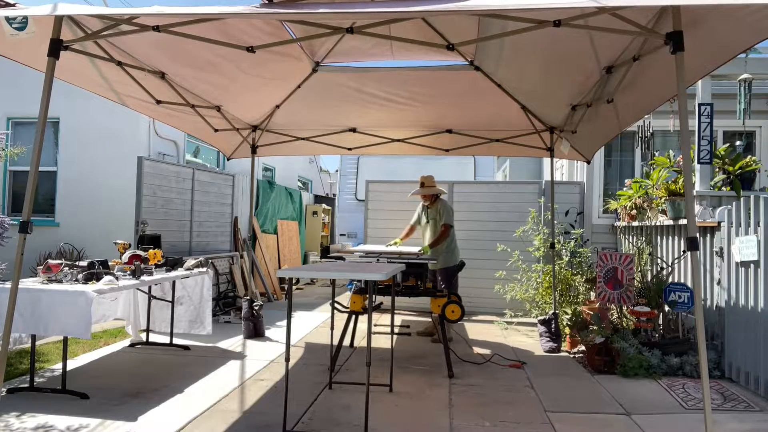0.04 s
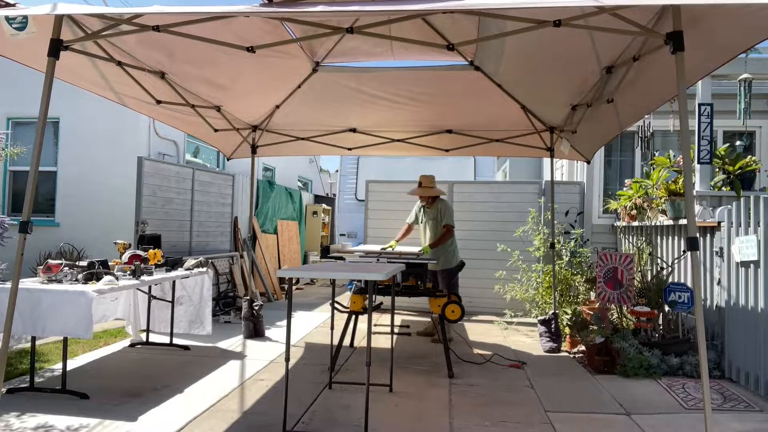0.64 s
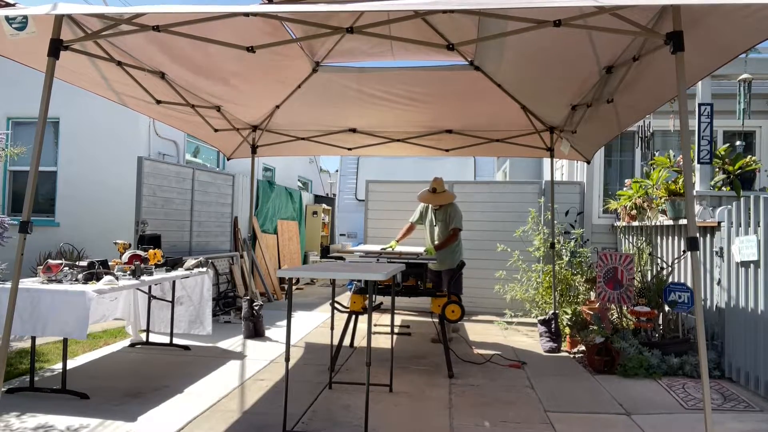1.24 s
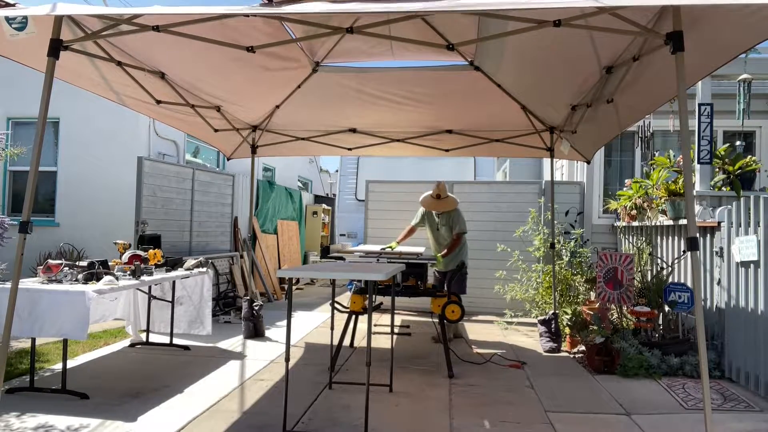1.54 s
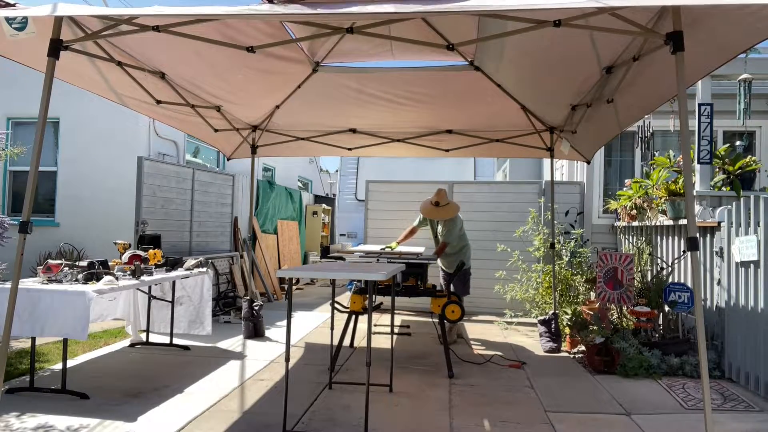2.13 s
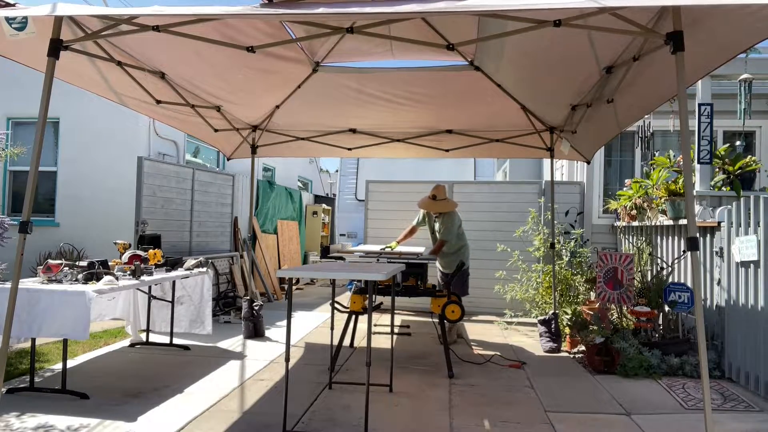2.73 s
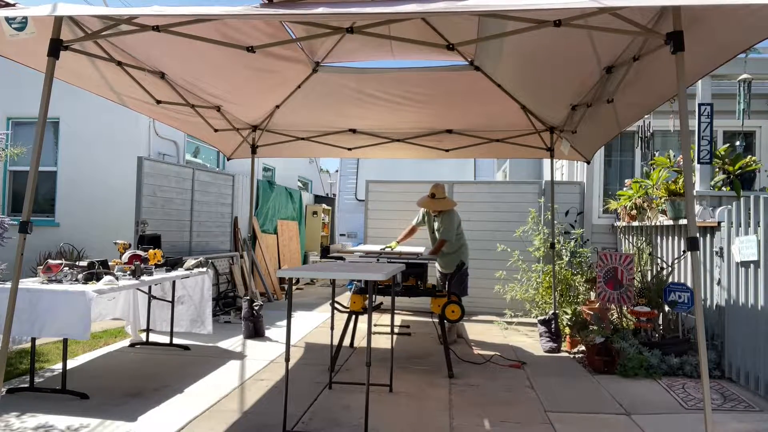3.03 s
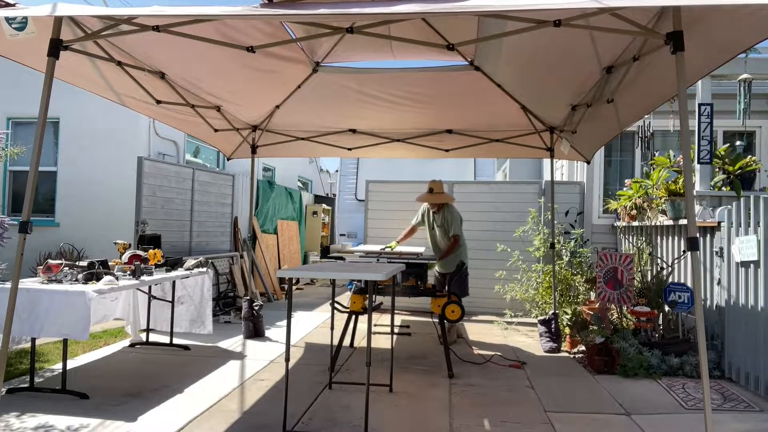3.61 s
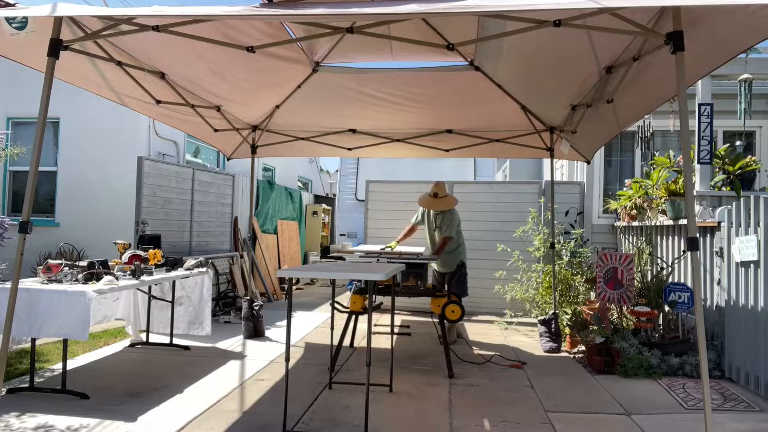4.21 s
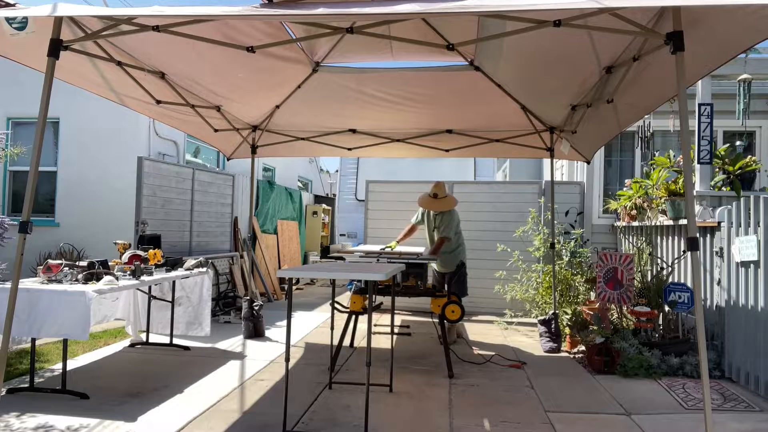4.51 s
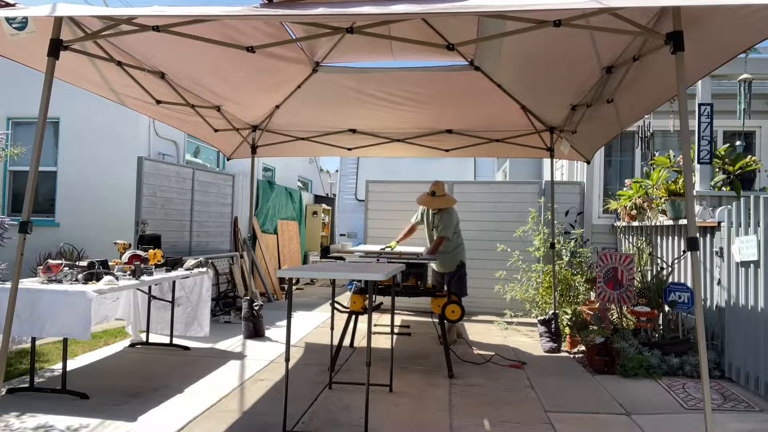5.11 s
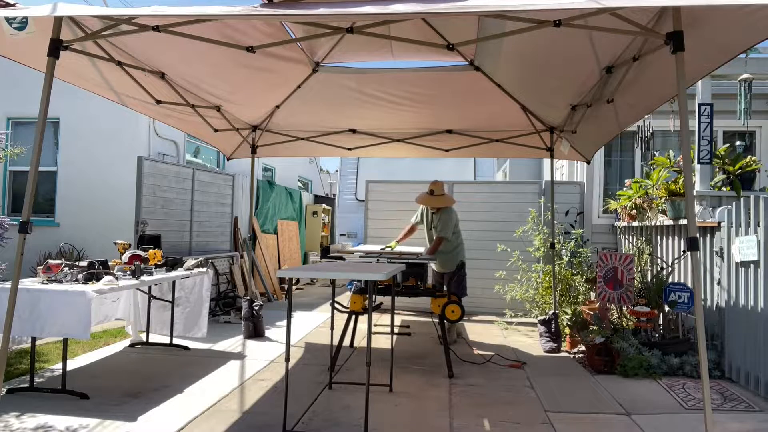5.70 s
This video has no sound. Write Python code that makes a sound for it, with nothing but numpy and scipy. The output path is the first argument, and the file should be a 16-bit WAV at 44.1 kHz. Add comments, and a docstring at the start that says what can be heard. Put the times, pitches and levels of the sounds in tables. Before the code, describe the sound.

For the first two seconds, a breeze rumbles and thumps on the microphone over a faint, low outdoor rush. Beneath it a wooden board slides softly across a saw table in short grainy strokes, with a few light ticks up to about 2.5 seconds. At 2.7 seconds a table saw starts with a loud slam and clatter, its steel stand ringing briefly. The motor hums and sizzles, the gears roar and a whine climbs. At about 3.2 seconds the power cuts and the saw coasts down, the whine falling while the blade rings and shimmers, with a few more wind bumps until around 4 seconds. A small tick comes at 5.2 seconds. At 5.4 seconds the saw jolts on again, roaring and rising in pitch, and is still running at the end, near 6 seconds.

```python
"""First a breeze thumps on the microphone while a wooden board slides and ticks on a saw table outdoors.
Then the table saw starts with a slam, runs for half a second, coasts down and is switched on again.
Each start jolts the gears and sets the steel stand ringing. The gears roar, the motor hums and sizzles,
the cooling fan whines higher as the speed climbs, and the spinning blade rings and shimmers."""
import sys
import numpy as np
from scipy import signal
from scipy.fft import rfft, irfft, next_fast_len
from scipy.io import wavfile
from scipy.ndimage import uniform_filter1d

SR = 44100
rng = np.random.default_rng(int(sys.argv[2]) if len(sys.argv) > 2 else 0)


def pcm_store(signal):
    """Save signal as 16-bit PCM."""
    levels = np.round(np.clip(np.atleast_2d(signal), -1, 1) * 32767)
    wavfile.write(sys.argv[1], SR, levels.astype(np.int16).T)


N = 262395
T = np.arange(N) / SR
HZ = np.fft.rfftfreq(N, 1 / SR)

# When the motor has power. Each row: on and off in seconds, then what the load adds, in dB:
# gear roar, brush sizzle, change in the blade's ring, fan whine.
MOTOR_RUNS = [(2.687, 3.175, -38, -31.5, 3.5, -24), (5.361, 6.1, -24, -30, -7, -17.5)]
# Motor speed is always given as the pitch of its fan, in Hz.
TOP_HZ, FAN_CYCLES_PER_BLADE_TURN = 3510, 42.7


def amp(db):
    """Turns decibels into a gain."""
    return np.exp(np.asarray(db) * (np.log(10) / 20))


def unit(x):
    """Scales a sound so that the mean of its channels has an average strength (rms) of 1."""
    return x / np.sqrt(np.mean(np.atleast_2d(x).mean(0) ** 2) + 1e-20)


def curve(points, hz=HZ):
    """Joins rows of frequency and value into a curve over all frequencies."""
    f, value = np.transpose(points)
    return np.interp(np.log(hz + 1), np.log(f + 1), value)


def lift(resonances):
    """The boost or cut in dB that a set of resonances gives each frequency."""
    return sum(db / (1 + (2 * (HZ - hz) / width) ** 2) for hz, width, db in resonances)


def ripple(size):
    """Random peaks and dips over frequency; a larger size makes them wider."""
    return unit(uniform_filter1d(rng.standard_normal(len(HZ)), size=size))


def coloured(x, spectrum_db):
    """Filters a sound with a gain in dB for each frequency."""
    size = next_fast_len(N + SR // 4, True)
    gain = amp(np.interp(np.fft.rfftfreq(size, 1 / SR), HZ, spectrum_db))
    return irfft(rfft(x, size) * gain, size)[..., :N]


def ramp(start, rise):
    """Climbs from 0 to 1 in rise seconds."""
    return np.clip((T - start) / rise, 0, 1)


def held(start, end, rise, fall):
    """A level that ramps up, holds until the end, and dies away."""
    return ramp(start, rise) * np.exp(-np.maximum(T - end, 0) / fall)


def add(mix, start, sound):
    """Mixes a sound in at a start time in seconds."""
    part = mix[:, round(start * SR):][:, :sound.shape[1]]
    part += sound[:, :part.shape[1]]


def drift(hz):
    """A random wobble, in complex numbers, that changes up to about hz times a second."""
    t = np.linspace(0, T[-1], 16384)
    f = np.fft.fftfreq(len(t), t[1])
    wobble = np.fft.ifft(np.exp(2j * np.pi * rng.random(len(t))) / (1 + (f / hz) ** 4))
    return np.interp(T, t, wobble / wobble.std())


def wavering_tone(cycles, shake, shake_hz):
    """A tone whose strength and phase waver; shake runs from 0 (pure) to 1 (all wobble)."""
    wobble = drift(shake_hz)
    angle = np.float32(2 * np.pi * (cycles - np.floor(cycles) + rng.random()))
    steady = np.sqrt(1 - shake ** 2)
    return (steady + shake * wobble.real) * np.cos(angle) - shake * wobble.imag * np.sin(angle)


def noise(spectrum_db, count=N):
    """Stereo noise of strength 1 with a given spectrum; it reaches the right side slightly earlier."""
    # How the microphone's two sides compare. Each row: frequency in Hz, then the value named.
    likeness = [(60, .42), (150, .42), (300, .8), (700, .7), (2000, .62), (4500, .5), (8000, .82),
                (15000, .8)]  # how alike they are, from 0 to 1
    balance = [(60, 0.0), (120, 0.43), (240, 0.9), (480, 0.75), (950, -1.1), (1890, -1.3), (3770, 1),
               (7520, -0.91), (15000, 0.0)]  # left minus right in dB
    left_lead = [(100, 0), (450, -.2), (1000, -.35), (3700, -1.1), (5700, -1.7), (8500, -1.8),
                 (13000, -1.1)]  # how far the left is ahead, in radians
    size = next_fast_len(count, True)
    f = np.fft.rfftfreq(size, 1 / SR)
    same, lean_db = np.clip(curve(likeness, f), 0, 1), curve(balance, f)
    common, separate = rng.standard_normal((2, len(f))) + 1j * rng.standard_normal((2, len(f)))
    left = common * np.exp(1j * curve(left_lead, f)) * amp(lean_db / 2)
    right = (same * common + np.sqrt(1 - same ** 2) * separate) * amp(-lean_db / 2)
    gain = amp(np.interp(f, HZ, spectrum_db))
    return unit(irfft(np.array([left, right]) * gain, size)[:, :count])


def neighbourhood(level_db=-59):
    """The faint, steady, low rush of the surroundings."""
    # Each row: frequency in Hz, relative level in dB.
    spectrum = [(15, -49), (25, -65.5), (76, -9.5), (206, -11.5), (277, -3.5), (326, -16.5), (394, -7.5),
                (796, -19), (1700, -29), (3340, -43.5), (8140, -46), (10700, -57.5), (13600, -54.5),
                (16000, -75)]
    return amp(level_db) * noise(curve(spectrum))


def wind(calm_db=-58, lump_db=4.5):
    """Gusts buffet the microphone with a lumpy rumble; single swirls of air push and then pull on it."""
    # The rumble. Each row: frequency in Hz, relative level in dB.
    spectrum = [(20, -18), (45, 2.5), (80, 5.5), (115, 0.5), (170, -7), (300, -16), (600, -31.5),
                (1500, -68), (4000, -115)]
    # Each row: start in seconds, length in seconds, level in dB.
    gusts = [(-.1, 0.76, -46.5), (0.47, 0.24, -45.5), (0.73, 0.89, -41), (2.138, 0.03, -51),
             (2.573, 0.25, -60), (2.803, 0.57, -63), (3.114, 0.059, -35.5), (3.589, 0.26, -40.5),
             (3.989, 0.16, -41), (5.11, 0.58, -50.5), (5.4, 0.67, -45.5)]
    # Each row: start in seconds, level in dB, rough length of the first push in seconds.
    swirls = [(0.391, -19.5, 0.0039), (0.513, -33, 0.0069), (0.755, -31, 0.0065), (0.993, -37, 0.0015),
              (1.11, -31, 0.0036), (1.244, -32, 0.0015), (1.26, -34, 0.0015), (1.615, -35.5, 0.0016),
              (3.152, -33, 0.0023), (4.111, -33, 0.0022)]
    gust_power = sum((amp(db) * held(start, start + length, rise=0.068, fall=0.03)) ** 2
                     for start, length, db in gusts)
    level = np.sqrt(amp(calm_db) ** 2 + gust_power) * amp(lump_db * drift(20).real)
    out = level * noise(curve(spectrum))
    for start, db, length in swirls:
        age = np.arange(SR // 4) / SR / length
        pressure = np.sin(np.pi * age / (1 + age / 20)) * age / 2 * np.exp(1 - age / 2)
        add(out, start, amp(db) * pressure[None])
    return out


def board(slide_db=-4, swish_db=-4, grain_db=2, fast_db=-52):
    """Wood slides over the table in grainy strokes, brighter when fast, and ticks on the guide fence."""
    # Pushes of the board. Each row: middle in seconds, length in seconds, level in dB.
    strokes = [(0.173, 0.66, -63), (0.618, 0.23, -66.5), (0.844, 0.23, -61.5), (1.02, 0.12, -62.5),
               (1.177, 0.12, -63), (1.294, 0.09, -59), (1.456, 0.18, -59.5), (1.647, 0.22, -54),
               (1.656, 0.049, -60), (1.855, 0.2, -62.5), (2.084, 0.3, -58)]
    # Light knocks. Each row: start in seconds, level in dB, fade in seconds.
    ticks = [(.233, -75.5, 0.042), (1.01, -77, .03), (1.28, -75.5, 0.062), (1.762, -73.5, 0.04),
             (2.006, -69, .008), (2.414, -67.5, .007), (2.471, -70, 0.0085), (5.236, -55, 0.0044)]
    # Plain sliding and a fast swish. Each row: frequency in Hz, relative level in dB.
    slide_spectrum = [(200, -4), (600, 17), (1700, 9.5), (2700, -1), (4500, -42), (8000, -15), (16000, -45)]
    swish_spectrum = [(400, 1.5), (1700, 5), (3000, -1), (5000, -14), (6500, -24), (16000, -53)]
    push = np.sqrt(sum(amp(db) ** 2 * np.exp(-2 * (2 * (T - middle) / length) ** 2)
                       for middle, length, db in strokes))
    grain = amp(grain_db * drift(120).real)
    pace = np.minimum(push / amp(fast_db), 1)
    slide = amp(slide_db) * noise(curve(slide_spectrum))
    swish = amp(swish_db) * pace * noise(curve(swish_spectrum))
    tick_level = sum(amp(db) * held(start, start, 0.00057, fade) for start, db, fade in ticks)
    tick_noise = noise(curve([(500, 1), (2500, 9), (8500, 8), (16000, -35)]))
    return push * grain * (slide + swish) + tick_level * tick_noise


def yard_echoes(x, echo_db=-3, decay_s=0.1):
    """The direct sound plus scattered echoes from paving, walls and a canopy."""
    t = np.arange(SR // 2) / SR
    taps = rng.standard_normal((2, len(t))) * (rng.random((2, len(t))) < .04)
    taps *= (t > .002) * amp(-60 * t / decay_s)
    taps *= amp(echo_db) / np.linalg.norm(taps, axis=1, keepdims=True)
    taps[0, 2] += 1  # the direct sound reaches the left two samples late
    taps[1, 0] += 1
    return signal.oaconvolve(x[None], taps, axes=1)[:, :N] / np.sqrt(1 + amp(echo_db) ** 2)


def motor_speed(spin_up_s=.255, coast_s=.49, crawl_hz=255):
    """With power the speed climbs toward the top; without it, it sinks toward a crawl."""
    speed = np.ones(N)
    for on, off, *_ in MOTOR_RUNS:
        for start, goal, lag in ((on, TOP_HZ, spin_up_s), (off, crawl_hz, coast_s)):
            after = T >= start
            gap = np.interp(start, T, speed) - goal
            speed[after] = goal + gap * np.exp((start - T[after]) / lag)
    return speed


def blade_turns(speed):
    """How many turns the blade has made so far."""
    return np.cumsum(speed / FAN_CYCLES_PER_BLADE_TURN) / SR


def effort(speed, top_db, halving_db, load_column, inrush_db):
    """A sound's strength: a part from spin, weaker each time speed halves, and a part from the load."""
    spin = amp(top_db + halving_db * np.log2(speed / TOP_HZ))
    load = sum(amp(run[load_column]) * held(run[0], run[1], 0.013, 0.0057) for run in MOTOR_RUNS)
    inrush = amp(inrush_db * (1.5 - speed / TOP_HZ))  # counts most at standstill
    return np.hypot(spin, load * inrush)


def housing():
    """The boost or cut in dB that the saw's shell and table give to whatever shakes them."""
    # Each row: frequency in Hz, width in Hz, boost in dB.
    resonances = [(198.6, 10.8, 11.5), (258, 37, -1.5), (283, 31, 4.5), (377, 16, 3.5), (451.8, 11.3, 11),
                  (429, 11, 2), (543, 88, -9), (607, 4, 1.5), (756, 49, 7.5), (806.5, 17.4, 7.5),
                  (942.5, 16, 12.5), (1051, 18, 7), (1162, 45, 3.5), (1560, 13, -4), (1756, 37, 10.5),
                  (1890, 100, 5), (2790, 300, 1.5)]
    return lift(resonances)


def winding_hum(powered, speed, silent_hz=3900):
    """The motor's coils hum with the rush of starting current, less as it gathers speed."""
    # Each row: frequency in Hz, relative level in dB.
    harmonics = [(120, -55.5), (240, -48.5), (480, -36.5), (960, -46)]
    hum = sum(amp(db) * 2 * np.sin(2 * np.pi * hz * T) for hz, db in harmonics)
    return powered * np.clip(1 - speed / silent_hz, 0, 1) * hum


def stand_ring(pitch_hz=443):
    """The kick of the motor leaves the steel stand ringing on one low note."""
    # Each row: start in seconds, level in dB, rise in seconds, fade in seconds.
    kicks = [(2.691, -27, 0.063, 0.093), (5.38, -32, 0.13, 0.048)]
    level = sum(amp(db) * held(start, start + rise, rise, fade) for start, db, rise, fade in kicks)
    return np.sqrt(2) * level * np.sin(2 * np.pi * pitch_hz * T)


def blade_air(speed, level_db=-32, at_speed_hz=3000, centre_hz=820):
    """Air torn by the teeth: a slightly lumpy rush that grows steeply with speed."""
    level = amp(level_db - 0.7 * drift(25).real) * (speed / at_speed_hz) ** 2.5
    return level * noise(-55 * np.log2((HZ + 1) / centre_hz) ** 2 + .5 * housing())


def sizzle(powered, speed, brush_db=-13.5, rim_db=-5.5, buzz_hz=120, grain_db=1.3):
    """The motor's brushes spark in time with the mains; slow coasting leaves the rim's duller hiss."""
    # The hiss. Each row: frequency in Hz, relative level in dB.
    spectrum = [(2500, -19), (4000, 2.5), (4700, -1), (5400, -8), (7200, 4.5), (8500, 4.5), (10000, -19.5),
                (13000, -12), (16000, -11.5)]
    # Crowded resonances of the toothed rim, and gaps. Each row: frequency in Hz, width in Hz, boost in dB.
    rim_bands = [(3900, 400, 3), (4350, 150, -5), (4620, 120, 9), (5200, 450, -7), (5950, 450, 7),
                 (6450, 300, -13), (6850, 200, -4), (7750, 300, -6), (8750, 400, -6)]
    fast = np.clip(np.maximum(powered, (speed / 2600) ** 2), 0, 1)
    echo_db = 4.2 * ripple(size=300)
    buzz = 1 + 0.11 * powered * np.sin(2 * np.pi * buzz_hz * T)
    brushes = amp(brush_db) * buzz * noise(curve(spectrum) + .5 * lift(rim_bands) + echo_db)
    treble_cut_db = 8 * np.log2(np.maximum(HZ / 6000, 1))
    rim = amp(rim_db) * noise(curve(spectrum) + lift(rim_bands) + .5 * echo_db - treble_cut_db)
    level = effort(speed, top_db=-26.5, halving_db=9.6, load_column=3, inrush_db=8)
    grain = amp(grain_db * drift(270).real)
    return level * grain * (np.sqrt(fast) * brushes + np.sqrt(1 - fast) * rim)


def rim_shimmer(speed, throb_db=4.2, throb_hz=15, shake=.92):
    """The teeth set the rim singing; each note swells and throbs as the blade passes its best speed."""
    # Each row: pitch at rest in Hz, cycles gained per turn, width in Hz, level in dB, best speed in Hz,
    # octaves of speed away from it at which the note is 6 dB weaker.
    notes = [(1485, 0, 25, -56, 520, 1), (1850, 0, 240, -46, 1500, .7), (2200, 0, 280, -43, 2000, .4),
             (2800, 0, 110, -63, 380, .7), (3300, 0, 100, -62, 360, .7), (3930, 0, 110, -51, 1700, .6),
             (4100, 0, 200, -63, 480, .8), (4600, 0, 55, -49.5, 1150, .92), (4700, 5, 70, -51, 1300, .6),
             (5650, 0, 60, -55, 1700, .75), (5910, 11, 140, -56, 720, 1.1), (7100, 0, 60, -50, 1350, .72),
             (7480, 0, 80, -58, 1200, .7), (8200, 0, 200, -56, 1300, 1), (9100, 7, 90, -55, 1600, .9)]
    turns, out = blade_turns(speed), 0
    for hz, cycles, width, db, best_hz, reach in notes:
        swell_db = np.maximum(-6 * (np.log2(speed / best_hz) / reach) ** 2, -80)
        level = amp(db + swell_db + throb_db * drift(throb_hz).real)
        out += level * wavering_tone(hz * T + cycles * turns, shake, width)
    return out


def blade_ring(speed, shake=.6, shake_hz=7, main_hz=1690, echo_db=1.2):
    """Spin splits the disc's notes into forward and backward waves, whose pitches close up as it slows."""
    # Each row: pitch at rest in Hz, cycles gained per turn (minus means backward),
    # level at top speed in dB, dB lost each time the speed halves.
    waves = [(1497, -2, -36.5, 11), (1525, 2, -40, 8), (1716, -2, -42, 8), (1686, 0, -49, 4.5),
             (1686, 3, -41, 4.6), (1686, -3, -51, 3.2), (1686, 6, -56, 1.9), (1686, -6, -54, 3.5),
             (1893, 6, -47, 5.6), (1893, -6, -49, 5), (2020, 3, -36.5, 9), (2018, -3, -47, 5.5),
             (2143, -2, -54, 4), (2800, -1.4, -45, 7.5), (3295, 4.5, -44, 8.5), (3295, -4.3, -48, 8),
             (3770, 4.8, -43, 10), (4000, -4, -46.5, 8)]
    turns, octaves = blade_turns(speed), np.log2(speed / TOP_HZ)
    ring = 0
    for hz, cycles, db, loss in waves:
        waver_hz = shake_hz * (hz / main_hz) ** 1.5  # higher notes waver faster
        ring += amp(db + loss * octaves) * wavering_tone(hz * T + cycles * turns, shake, waver_hz)
    load_db = sum(ring_db * held(on, off, 0.077, 0.025) for on, off, _, _, ring_db, _ in MOTOR_RUNS)
    return np.sqrt(2) * amp(load_db) * coloured(ring, echo_db * ripple(size=140))


def fan_whine(speed, clean=.18, smear_hz=90, echo_db=.8):
    """Fan and gear tones glide with the motor through the shell's resonances; swirling air blurs them."""
    # One entry per tone: its multiple of the fan's pitch, and its relative level in dB.
    multiples = [.444, 1, 1.44, 2, 3, 4]
    levels_db = [-1.5, 2.5, -9, -4, -8.5, -10.5]
    # How well the saw gives off these tones. Each row: frequency in Hz, gain in dB.
    radiation = [(120, -40), (250, -20), (340, -16), (390, -13), (420, -8), (448, -1), (470, -4),
                 (495, -10), (540, -22), (680, -19), (745, -5), (810, -4), (880, 0), (945, 1), (1010, -7),
                 (1100, -7), (1190, -4.5), (1400, -4), (1800, 0), (2000, -1), (2300, 2), (2550, 0),
                 (2800, -1), (2950, -7), (3150, -3.5), (3400, -6), (4500, -6), (7000, -13), (12000, -24)]
    cycles = np.cumsum(speed) / SR
    flow_time = np.cumsum((speed / 2000) ** 1.3) / SR  # swirls pass faster as the fan speeds up
    tones = 0
    for multiple, db in zip(multiples, levels_db):
        smear = np.interp(flow_time, T, drift(smear_hz * multiple ** .7))
        tones += amp(db) * ((clean / multiple + smear) * np.exp(2j * np.pi * multiple * cycles)).real
    # The inrush is a cut here: the fan moves little air until it is up to speed.
    level = effort(speed, top_db=-33.5, halving_db=4.5, load_column=5, inrush_db=-15)
    return level * coloured(tones, curve(radiation) + .5 * housing() + echo_db * ripple(size=600))


def gear_roar(speed, fast_db=-2, slow_db=-3.5, fast_hz=2100, pulse_depth=0.017, flutter_db=1.5):
    """Gear teeth and fan air roar in the shell, pulsing faintly with each blade turn; thinner when slow."""
    # Fast and slow running. Each row: frequency in Hz, relative level in dB.
    fast_spectrum = [(90, -72), (150, -17), (340, -6), (460, -0.5), (560, 2), (920, -6), (1480, -8.5),
                     (2270, -3), (4300, -10.5), (7900, -11), (10000, -17.5), (13000, -93), (16000, -36)]
    slow_spectrum = [(120, -34), (200, -19), (360, -6), (460, -5), (650, -21), (800, -3.5), (1400, -6),
                     (1700, -6.5), (2300, -9.5), (4100, -15), (6500, -19.5), (11000, -99)]
    fast = np.clip(speed / fast_hz, 0, 1) ** 2
    roar = np.sqrt(fast) * amp(fast_db) * noise(curve(fast_spectrum) + housing())
    whirr = np.sqrt(1 - fast) * amp(slow_db) * noise(curve(slow_spectrum) + housing())
    pulse = 1 + pulse_depth * np.sin(2 * np.pi * blade_turns(speed))
    flutter = amp(flutter_db * drift(37).real)
    level = effort(speed, top_db=-28, halving_db=5.61, load_column=2, inrush_db=-3)
    return level * (roar + whirr) * pulse * flutter


def jolts_and_bites(rattle_db=2):
    """The gears take up their slack with a thud, then the blade and its clamp clatter and scrape; later, brief
    swells near 800 Hz mark the board biting the spinning blade."""
    # Each row: start in seconds, level in dB, rise and fade in seconds, centre in Hz, spread in octaves.
    jolts = [(2.687, -19.5, 0.011, 0.077, 880, 1.13), (2.7, -32.5, 0.037, 0.029, 84, 0.99),
             (2.706, -23.5, 0.024, 0.063, 450, 0.7), (2.728, -12.5, 0.018, 0.018, 1600, 1.08),
             (2.731, -17.5, 0.014, 0.044, 7900, 1.33), (2.817, -18.5, 0.014, 0.09, 6100, 2.24),
             (2.908, -25, 0.011, 0.033, 11120, 0.68), (5.361, -20, 0.0019, 0.13, 1020, 0.85),
             (5.364, -38, 0.023, 0.018, 85, 1.3), (5.371, -21.5, 0.031, 0.083, 421, 0.59),
             (5.41, -16, 0.014, 0.024, 1410, 1.55), (5.408, -23, 0.014, 0.033, 8800, 0.82),
             (5.53, -25.5, 0.0079, 0.038, 8560, 0.68), (5.68, -32.5, 0.02, 0.045, 800, 0.33),
             (5.89, -26, 0.027, 0.026, 835, 0.41)]
    # Clashing metal. Each row: frequency in Hz, relative level in dB.
    spectrum = [(50, -37), (100, 18), (330, -13.5), (440, -5.5), (560, -12.5), (1450, -13), (1760, -13.5),
                (2130, -11), (8100, -14), (12500, -23.5), (16000, -23.5)]
    shell_db = curve(spectrum) + housing() + 2 * ripple(size=450)
    out, t = np.zeros((2, N)), np.arange(SR) / SR
    for start, db, rise, fade, hz, spread in jolts:
        shape = np.minimum(t / rise, 1) ** 0.6 * np.exp(-np.maximum(t - rise, 0) / fade)
        band_db = -6 * (np.log2((HZ + 1) / hz) / spread) ** 2
        add(out, start, amp(db) * shape * noise(shell_db + band_db, count=SR))
    return out * amp(rattle_db * (drift(700).real - 0.64))


def table_saw():
    """One motor speed drives all the running sounds; jolts and the stand's ring mark each start."""
    speed = motor_speed()
    powered = sum(ramp(on, 0.012) * (1 - ramp(off, 0.0066)) for on, off, *_ in MOTOR_RUNS)
    tones = yard_echoes(fan_whine(speed) + blade_ring(speed) + rim_shimmer(speed))
    rush = gear_roar(speed) + blade_air(speed) + sizzle(powered, speed)
    running = tones + rush + winding_hum(powered, speed)
    started = ramp(MOTOR_RUNS[0][0] - .006, .02) ** 2  # silent until the first start
    return started * running + jolts_and_bites() + stand_ring()


def scene():
    """Saw, board and breeze over the quiet of the neighbourhood."""
    return table_saw() + board() + wind() + neighbourhood()


def record(dry, notch_hz=11250, notch_width_hz=880, notch_db=-50, top_hz=15850):
    """The microphone has a deep, narrow dip in the high treble, and the very top is cut off."""
    heard = coloured(dry, notch_db * np.exp(-((HZ - notch_hz) / notch_width_hz) ** 4))
    low_pass = signal.firwin(511, top_hz, window=("kaiser", 9), fs=SR)
    return signal.oaconvolve(heard, low_pass[None], "same")


dry = scene()
out = record(dry)
pcm_store(out)
```